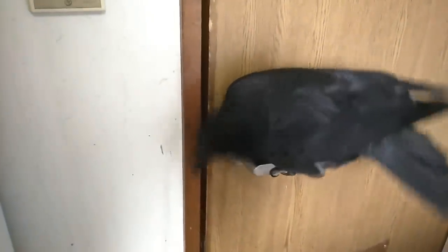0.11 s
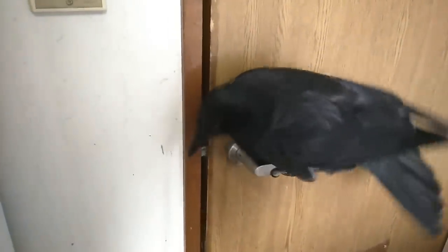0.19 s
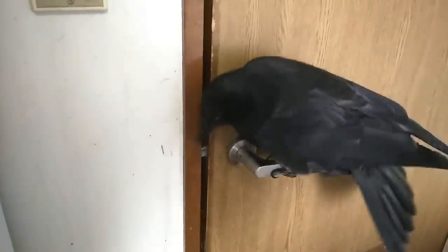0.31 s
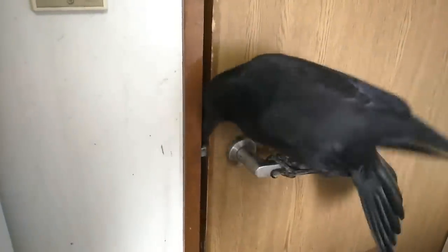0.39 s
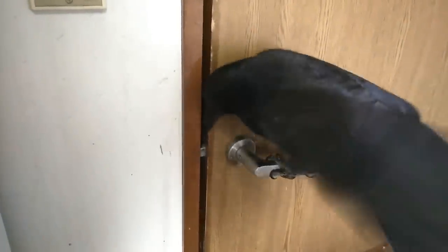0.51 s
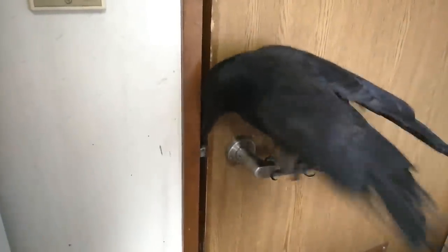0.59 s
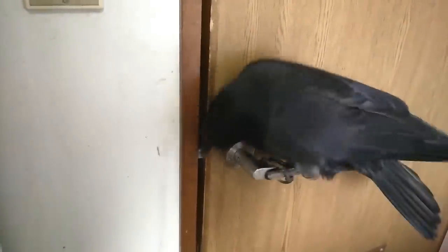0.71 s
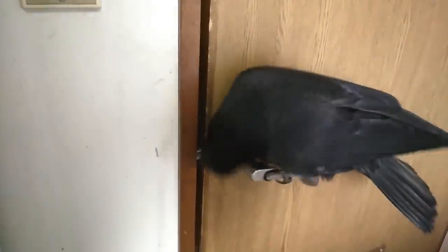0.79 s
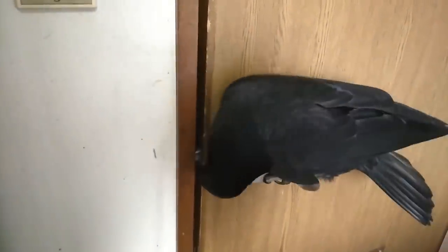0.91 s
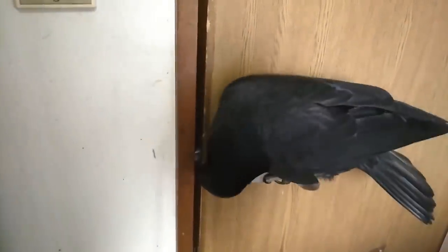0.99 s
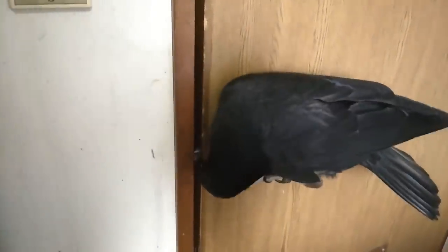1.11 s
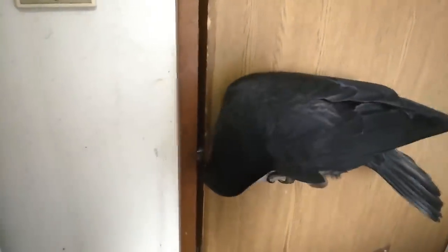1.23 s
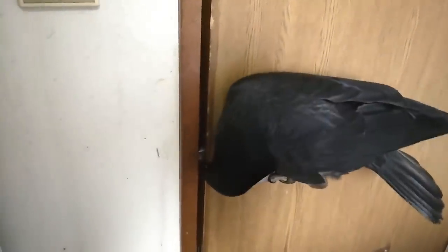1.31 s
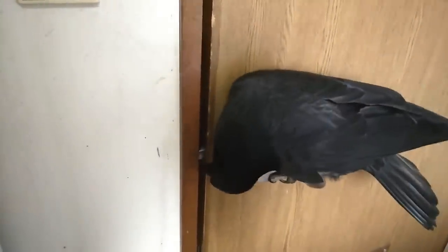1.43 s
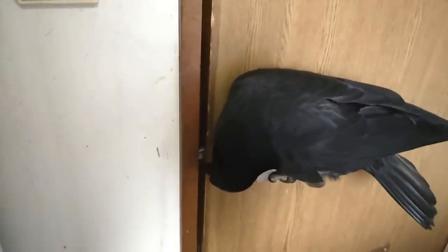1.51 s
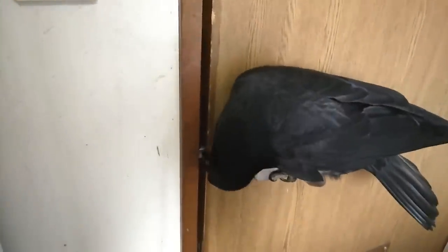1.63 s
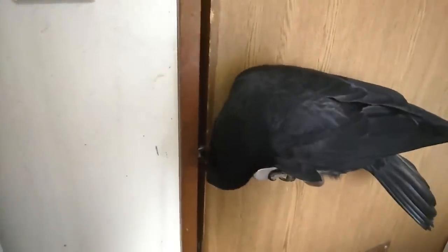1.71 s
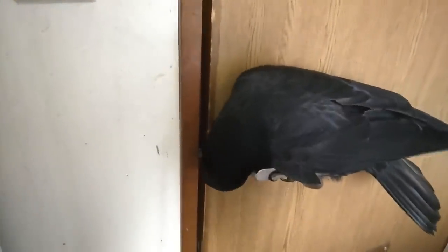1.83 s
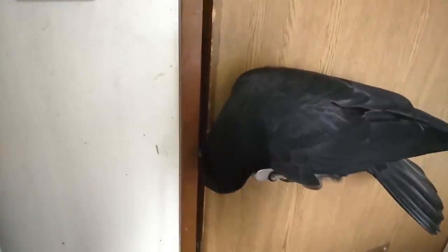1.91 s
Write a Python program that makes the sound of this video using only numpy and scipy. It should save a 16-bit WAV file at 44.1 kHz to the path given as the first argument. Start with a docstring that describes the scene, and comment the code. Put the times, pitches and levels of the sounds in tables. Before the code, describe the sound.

A metal door latch snaps in one loud, slightly clipped clack at 0.22 s, chattering briefly and ringing for about half a second. Before it, soft feather brushing, a faint peck and a short grind from 0.15 s. Claws tick and skid at 0.62-0.7 s with dull door thumps; feathers rustle until about 1.1 s. Light metallic pecks at 1.18, 1.25 and 1.81-1.84 s, faint grind near 1.96 s; small quiet room.

```python
"""A crow on a metal lever handle works at a wooden door in a small, bare room over quiet, coloured noise.
Feathers brush in uneven slips, a faint peck taps, the door bumps; filtered slips grind in the handle.
The latch lets go in one loud clack: resonant noise knocks, with decaying sines as the lock's ring.
Claws then tick and skid on the handle, the door thumps over a noise rumble, and brushes come and go.
Sharper pecks ring the same lock, with one faint late grind; dense decaying noise is the room's answer."""
import sys
import numpy as np
from scipy import signal
from scipy.fft import rfft, irfft
from scipy.io import wavfile

SR = 44100
rng = np.random.default_rng(int(sys.argv[2]) if len(sys.argv) > 2 else 0)


def dump_mix(stems):
    """Bounce the given channels to the path in sys.argv[1] as a 16-bit WAV at rate SR."""
    frames = np.atleast_2d(stems).T  # one column per channel
    limited = np.clip(frames, -1, 1)  # hard clip at full scale
    pcm = np.round(limited * 32767).astype(np.int16)
    wavfile.write(sys.argv[1], SR, pcm)


N = 88200

# Response lengths in samples; time over which a blow's level is reckoned
TAIL_SAMPLES, COLOUR_SAMPLES, BLOW_S = 24000, 4096, 0.03
# Spectral tilt is level below this; height and width of a struck spot's resonance
TILT_FROM_HZ, SPOT_DB, SPOT_OCTAVES = 110, 6.5, 0.17
# High-pass of every ring
RING_LOW_HZ = 450

# Decay of the room by band: centre_hz, t60_s
ROOM_DECAY = [(150, 0.37), (800, 0.38), (3000, 0.39), (8500, 0.36), (13000, 0.27)]
DIRECT_DB, DIRECT_T60_S, ROOM_BUILD_S, MIC_SPACING_M = -8.5, 0.0041, 0.0005, 0.17

# Spectrum of the room tone: freq_hz, density_db (per Hz)
ROOM_TONE_COLOUR = [(20, -21), (36, -4), (52, -22), (80, -9.5), (150, 1), (300, -14.5), (700, -8.5),
                    (1500, -12.5), (4000, -15.5), (8700, -18.5), (10200, -27), (14000, -26)]
ROOM_TONE_DB = -56

# Door bumps in its frame: start_s, level_db, tilt_db_per_octave
DOOR_BUMPS = [(0.127, -50, 2), (0.2450, -29.5, 7), (0.3250, -50.5, 2), (0.536, -45.5, 2),
              (0.6230, -37.5, 2.5), (0.6450, -37, 1.5), (0.6900, -47, -0.5), (0.7750, -44, -2),
              (0.8050, -44, 0), (0.831, -47, -6.5), (0.9350, -52, 4), (1.1850, -43, 0.5),
              (1.4750, -52.5, -3), (1.5750, -54, -3), (1.846, -49, -0.5)]
# Spectrum of the door leaf: freq_hz, density_db (per Hz)
DOOR_LEAF_COLOUR = [(20, -35), (36, -30), (52, 3.5), (75, -4.5), (115, 1), (220, -3.5), (380, -3),
                    (600, -13.5), (1000, -14.5), (2000, -34), (8000, -77)]
# Low rumble as the bird shifts its weight: time_s, level_db
RUMBLE_LEVELS = [(0, -56), (.3, -52), (.5, -49), (.87, -58.5), (1.02, -64), (1.15, -62.5), (1.4, -61),
                 (1.6, -63.5), (1.78, -61.5), (1.85, -56.5), (2, -57.5)]
DOOR_BODY_DB, DOOR_T60_S = -2, 0.36

# Feathers and feet brushing the door: start_s, rise_s, fall_s, level_db
FEATHER_BRUSHES = [(0.0, 0.0033, 0.16, -54.5), (0.505, 0.017, 0.24, -48), (0.72, 0.093, 0.15, -51.5),
                   (0.85, 0.074, 0.19, -48.5), (0.99, 0.022, 0.035, -56), (1.225, 0.0092, 0.025, -49),
                   (1.39, 0.014, 0.027, -58.5), (1.49, .02, 0.03, -54.5), (1.625, 0.0073, 0.011, -51.5),
                   (1.95, 0.007, 0.039, -50)]
# Spectrum of a brush: freq_hz, density_db (per Hz)
FEATHER_COLOUR = [(100, -8), (400, 2.5), (900, -18.5), (1600, -10), (2700, -3), (4200, -2.5), (6200, -1),
                  (8500, 6.5), (10200, -5), (13500, -7)]
BRUSH_RATE_HZ, BRUSH_SCATTER_DB = 3400, 6

# Claws clicking on the handle: start_s, level_db, ring_db (against the tick)
CLAW_TICKS = [(0.151, -52, -27), (0.221, -26.5, -11), (0.627, -38, -8), (0.7728, -42, -4),
              (0.8220, -54, -7)]
# Spectrum of a claw tick: freq_hz, density_db (per Hz)
CLAW_TICK_COLOUR = [(300, -24.5), (1500, 4), (3000, -1.5), (8000, 4.5), (10000, 3), (13000, -0.5),
                    (15000, 6.5)]
# Thin ring behind a tick: pitch_hz, level_db, t60_s
CLAW_RING_MODES = [(11200, -3, 0.18), (12900, -5, 0.093)]
CLAW_BODY_DB, CLAW_T60_S = -3, 0.081
CLAW_PAN_DB = 5.5  # left above right
# Foot skidding along the handle: start_s, rise_s, fall_s, level_db
FOOT_SKIDS = [(0.624, 0.007, 0.046, -39.5), (0.630, 0.033, 0.019, -31.5)]
# Spectrum of the skid: freq_hz, density_db (per Hz)
FOOT_SKID_COLOUR = [(200, -12), (600, -2), (1000, -15), (1600, -11.5), (2700, -2), (3800, -2.5),
                    (6200, 0.5), (8500, 4), (10200, -6.5), (13500, -13)]
SKID_RATE_HZ, SKID_SCATTER_DB, SKID_BODY_DB, SKID_T60_S = 3000, 8.5, 1, 0.034

# Ring of the lock case and handle: pitch_hz, level_db, t60_s
LOCK_RING_MODES = [(631, -5, .5), (667, 2, .42), (775, -5, .3), (1024, 2, .24), (1184, -4, .36),
                   (1213, -7, .36), (1326, -7, .35), (1625, -5, .33), (1768, -7, .25), (1833, -8, .25),
                   (2555, -10, .25), (2885, -9, .25), (4212, -14, .22), (8006, -12, .22)]

# Beak on the latch plate: start_s, level_db, tilt_db_per_octave, ring_focus_hz, spot_hz
BEAK_PECKS = [(0.0319, -54.5, 2, 2540, 2420), (1.1828, -37, 1, 1170, 2200),
              (1.2450, -47.5, -1.5, 1190, 1120), (1.3520, -53, -1.5, 790, 900),
              (1.8075, -37.5, 0.5, 1420, 3400), (1.8400, -40.5, -1, 630, 1530), (1.9724, -48, 0, 983, 2360)]
# Spectrum of a peck, also used for the grind: freq_hz, density_db (per Hz)
BEAK_COLOUR = [(60, -31), (150, 0.5), (300, -16.5), (550, 2.5), (900, -2), (1300, 3), (2000, -7),
               (2800, -11.5), (3500, -10.5), (5000, -13), (8500, -19.5), (10200, -27.5), (14000, -28)]
PECK_RING_DB, PECK_BODY_DB, PECK_T60_S = -3.5, 0.5, 0.11
RING_FOCUS_DB_PER_OCTAVE = 6.5

# Metal grinding under load: start_s, rise_s, fall_s, level_db
HANDLE_GRINDS = [(0.150, .008, 0.04, -36.5), (0.165, 0.015, 0.094, -39.5), (1.955, 0.013, 0.026, -51.5)]
GRIND_RATE_HZ, GRIND_SCATTER_DB = 1500, 4
# Latch snapping and chattering: start_s, level_db, spot_hz
LATCH_SNAPS = [(0.2163, -33.5, 3450), (0.2195, -12.5, 1540), (0.2238, -16, 1010), (0.2272, -17.5, 2560),
               (0.2366, -19, 665), (0.2549, -19.5, 1020)]
# Spectrum of the latch's crack: freq_hz, density_db (per Hz)
LATCH_CRACK_COLOUR = [(60, -36.5), (130, -24), (220, -7), (330, -13), (490, -5), (640, -3), (1050, -1),
                      (1350, -3.5), (1700, -3), (3100, -4.5), (3800, -12.5), (5600, -9), (8700, -10.5),
                      (10200, -26.5), (14000, -26.5)]
LATCH_RING_DB, LATCH_BODY_DB, LATCH_T60_S = -2.5, -7.5, 0.04

# Left minus right level: freq_hz, difference_db
STEREO_BALANCE = [(60, -0.5), (200, 0.9), (700, 2.5), (1300, 0.5), (2400, -2), (4300, -0.3), (8000, -1.5),
                  (10000, 3.5), (13000, 3.5)]
CLIP_LEVEL, TOP_HZ = 0.85, 14300


def undb(db):
    """Decibels to gain."""
    return 10 ** (np.asarray(db) / 20)


def unit(x):
    """Scale to unit energy per channel."""
    return x / np.sqrt(np.sum(x ** 2, axis=-1, keepdims=True))


def clock(size=N):
    """Time of each sample in seconds."""
    return np.arange(size) / SR


def along(points, hz):
    """Read (Hz, value) points on a log-frequency axis."""
    f, v = np.array(points, float).T
    return np.interp(np.log(np.maximum(hz, 1)), np.log(f), v)


def convolve(a, b):
    """Pass a through the response b, keeping the length of a."""
    return signal.fftconvolve(np.atleast_2d(a), np.atleast_2d(b), axes=1)[:, :a.shape[-1]]


def colour(points, tilt_db=0, spot_hz=None):
    """Minimum-phase unit-energy response: a spectrum, its tilt per octave and a struck spot's resonance."""
    size = COLOUR_SAMPLES
    hz = np.maximum(np.arange(size + 1) * SR / (2 * size), points[0][0])
    db = along(points, hz) + tilt_db * np.log2(np.maximum(hz, TILT_FROM_HZ))
    if spot_hz:
        db = db + SPOT_DB * np.exp(-(np.log2(hz / spot_hz) / SPOT_OCTAVES) ** 2)
    # Folding the cepstrum forward puts the energy as early as the spectrum allows
    cepstrum = irfft(db * np.log(10) / 20)
    cepstrum[1:size] *= 2
    cepstrum[size + 1:] = 0
    return unit(irfft(np.exp(rfft(cepstrum)))[:size])


def fade(t60):
    """Exponential decay, 60 dB down after t60 seconds."""
    decay = np.log(1000) * clock(TAIL_SAMPLES) / max(t60, 1e-4)
    return np.exp(-np.minimum(decay, 20))


def ring(modes):
    """Fading partials with a random phase in each channel, high-passed, so the onsets add no low thump."""
    partials = 0
    for hz, db, t60 in modes:
        cycles = hz * clock(TAIL_SAMPLES) + rng.random((2, 1))
        partials = partials + undb(db) * fade(t60) * np.sin(2 * np.pi * cycles)
    highpass = signal.butter(4, RING_LOW_HZ, "high", fs=SR, output="sos")
    return unit(signal.sosfilt(highpass, partials))


def place(x, start_s, db):
    """Start a unit-energy blow at start_s; db is its level when spread over BLOW_S."""
    blow = x * undb(db) * np.sqrt(BLOW_S * SR)
    return np.pad(blow, ((0, 0), (max(int(start_s * SR), 0), N)))[:, :N]


def diffuse(size=N):
    """Noise from all directions at two spaced microphones: alike in the bass, nearly unrelated above."""
    hz = np.arange(size // 2 + 1) * SR / size
    alike = np.sinc(2 * hz * MIC_SPACING_M / 343) * 0.98  # 343 m/s is the speed of sound
    phases = np.exp(2j * np.pi * rng.random((2, len(alike))))
    mid, side = phases * np.sqrt([1 + alike, 1 - alike])
    return unit(irfft(np.array([mid + side, mid - side]), size)) * np.sqrt(size)


def burst(t60):
    """A brief unit-energy shudder of dense vibrations."""
    return unit(diffuse(TAIL_SAMPLES) * fade(t60))


def small_room():
    """First arrival and dense reflections that die away band by band; each call draws a new pattern."""
    field = rfft(diffuse(TAIL_SAMPLES))
    hz = np.linspace(0, SR / 2, field.shape[1])
    centres = np.array(ROOM_DECAY)[:, 0]
    tail = 0
    # Neighbouring bands cross-fade, so their shares always add up to one
    for share, (_, t60) in zip(np.eye(len(centres)), ROOM_DECAY):
        band = irfft(field * along(list(zip(centres, share)), hz))
        tail = tail + band * fade(t60)
    build_up = 1 - np.exp(-clock(TAIL_SAMPLES) / ROOM_BUILD_S)
    return unit(unit(tail * build_up) + undb(DIRECT_DB) * burst(DIRECT_T60_S))


def knock(room, points, body_db, t60, tilt_db=0, spot_hz=None):
    """One contact: the struck body shudders and the room answers."""
    response = room + undb(body_db) * burst(t60)
    return unit(convolve(response, colour(points, tilt_db, spot_hz)))


def friction(strokes, rate_hz, scatter_db):
    """Tiny slips of random sign and strength, swelling and fading with each stroke."""
    happens = rng.random(N) < rate_hz / SR
    slips = happens * rng.choice([-1, 1], N) * undb(scatter_db * rng.standard_normal(N))
    force = 0
    for start_s, rise_s, fall_s, db in strokes:
        times = [start_s, start_s + rise_s, start_s + rise_s + fall_s]
        force = force + undb(db) * np.interp(clock(), times, [0, 1, 0])
    return unit(slips) * np.sqrt(N) * force


def room_tone():
    """Steady diffuse noise, coloured as the quiet air of the room."""
    return undb(ROOM_TONE_DB) * convolve(diffuse(), colour(ROOM_TONE_COLOUR))


def door():
    """The leaf bumps dully and rumbles under the shifting bird."""
    bumps = 0
    for start_s, db, tilt in DOOR_BUMPS:
        bump = knock(small_room(), DOOR_LEAF_COLOUR, DOOR_BODY_DB, DOOR_T60_S, tilt)
        bumps = bumps + place(bump, start_s, db)
    rumble = convolve(diffuse(), colour(DOOR_LEAF_COLOUR))
    swell = undb(np.interp(clock(), *np.array(RUMBLE_LEVELS).T))
    return bumps + rumble * swell


def feathers(room):
    """Plumage and feet slide over the wood in many small slips."""
    slips = friction(FEATHER_BRUSHES, BRUSH_RATE_HZ, BRUSH_SCATTER_DB)
    return convolve(convolve(slips, colour(FEATHER_COLOUR)), room)


def claws(room):
    """Bright ticks with a thin ring as the feet take a new grip, and one short skid of friction."""
    ticks = 0
    for start_s, db, ring_db in CLAW_TICKS:
        tick = knock(room, CLAW_TICK_COLOUR, CLAW_BODY_DB, CLAW_T60_S)
        ticks = ticks + place(tick + undb(ring_db) * ring(CLAW_RING_MODES), start_s, db)
    pan = undb(np.array([[CLAW_PAN_DB], [-CLAW_PAN_DB]]) / 2)
    slips = friction(FOOT_SKIDS, SKID_RATE_HZ, SKID_SCATTER_DB)
    skid = convolve(slips, knock(room, FOOT_SKID_COLOUR, SKID_BODY_DB, SKID_T60_S))
    return ticks * pan + skid


def beak():
    """Pecks ring the lock; each spot favours the modes near its own focus."""
    pecks = 0
    for start_s, db, tilt, focus_hz, spot_hz in BEAK_PECKS:
        modes = []
        for hz, level, t60 in LOCK_RING_MODES:
            loss_db = RING_FOCUS_DB_PER_OCTAVE * abs(np.log2(hz / focus_hz))
            modes.append((hz, level - loss_db, t60))
        tap = knock(small_room(), BEAK_COLOUR, PECK_BODY_DB, PECK_T60_S, tilt, spot_hz)
        pecks = pecks + place(tap + undb(PECK_RING_DB) * ring(modes), start_s, db)
    return pecks


def latch(room):
    """The handle grinds, the bolt snaps and chatters, and the hardest blow sets the lock ringing."""
    slips = friction(HANDLE_GRINDS, GRIND_RATE_HZ, GRIND_SCATTER_DB)
    grind = convolve(convolve(slips, colour(BEAK_COLOUR)), room)
    snaps = 0
    for start_s, db, spot_hz in LATCH_SNAPS:
        snap = knock(small_room(), LATCH_CRACK_COLOUR, LATCH_BODY_DB, LATCH_T60_S, spot_hz=spot_hz)
        snaps = snaps + place(snap, start_s, db)
    hardest_s, hardest_db, _ = max(LATCH_SNAPS, key=lambda blow: blow[1])
    lock_ring = place(ring(LOCK_RING_MODES), hardest_s, hardest_db + LATCH_RING_DB)
    return grind + snaps + lock_ring


def scene():
    """Bird, door and latch in one room, over a quiet room tone."""
    room = small_room()
    return room_tone() + door() + feathers(room) + claws(room) + beak() + latch(room)


def record(dry):
    """Left and right balanced by frequency, the left brighter at the top; clipped peaks, a steep top cut."""
    balance = along(STEREO_BALANCE, np.arange(N + 1) * SR / (2 * N))
    gains = undb(np.array([balance, -balance]) / 2)
    gains = gains / np.sqrt(np.mean(gains ** 2, axis=0))  # keep the mean power of the pair
    heard = irfft(rfft(dry, 2 * N) * gains)[:, :N]
    clipped = np.clip(heard, -CLIP_LEVEL, CLIP_LEVEL)
    lowpass = signal.ellip(10, 0.2, 90, TOP_HZ, fs=SR, output="sos")  # ripple and stopband in dB
    return signal.sosfilt(lowpass, clipped)


dry = scene()
out = record(dry)
dump_mix(out)
```